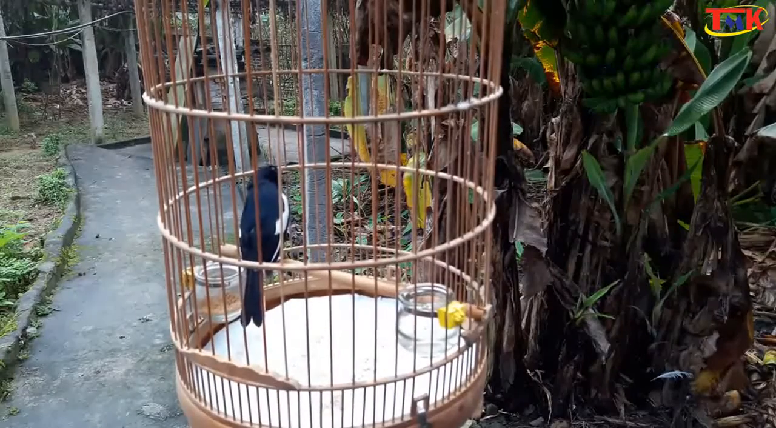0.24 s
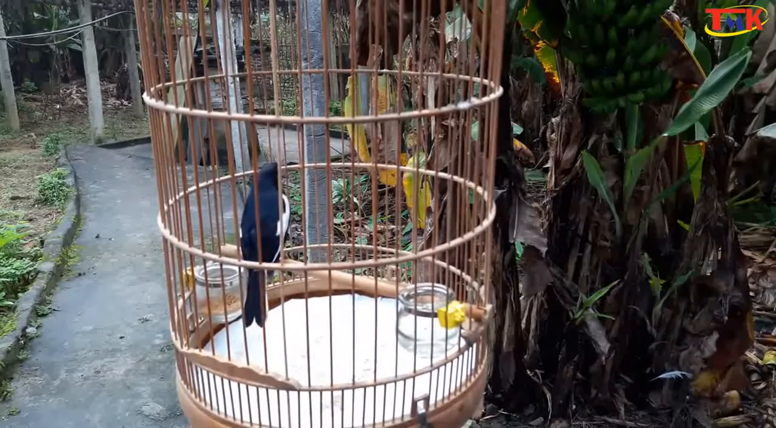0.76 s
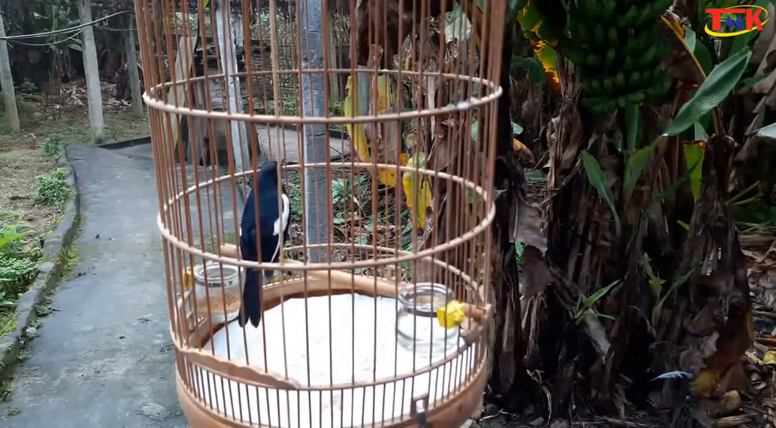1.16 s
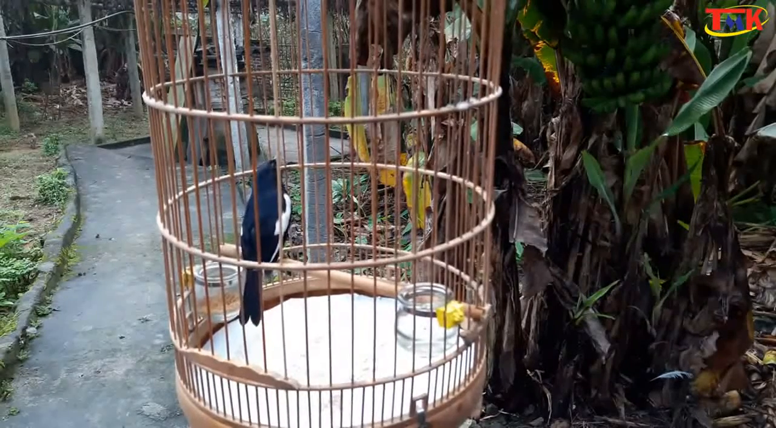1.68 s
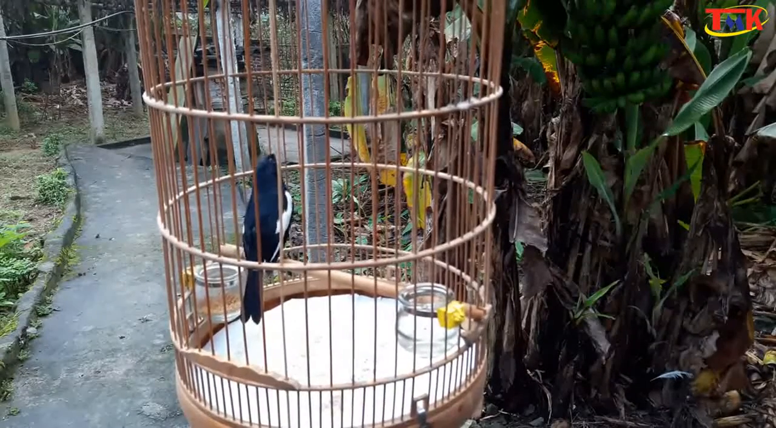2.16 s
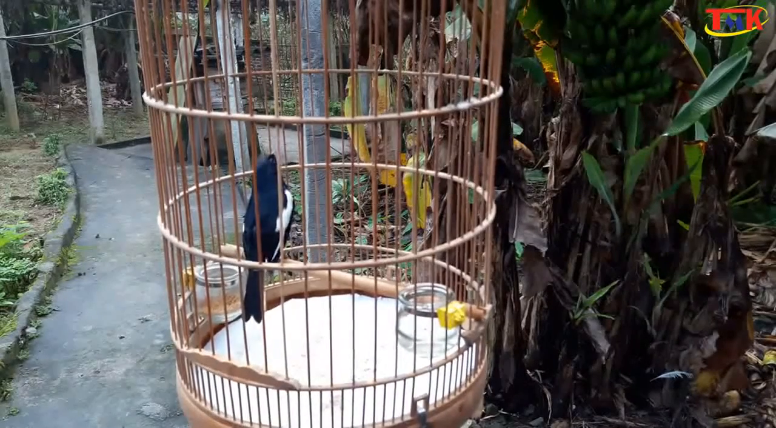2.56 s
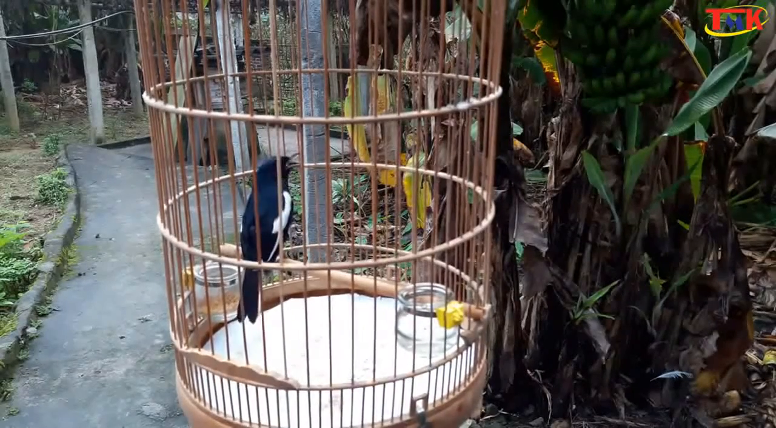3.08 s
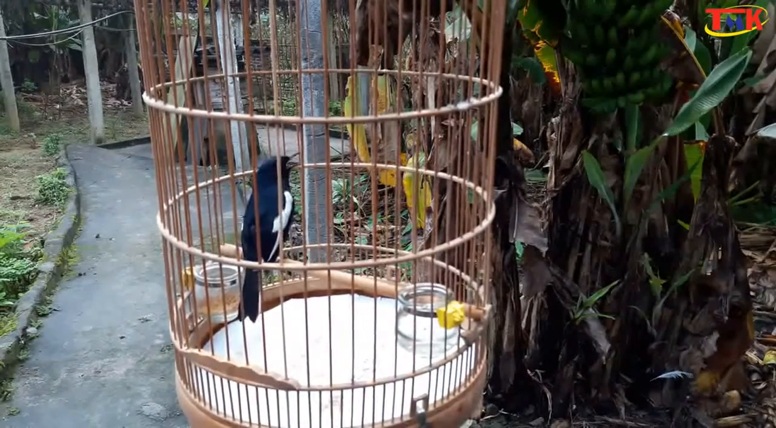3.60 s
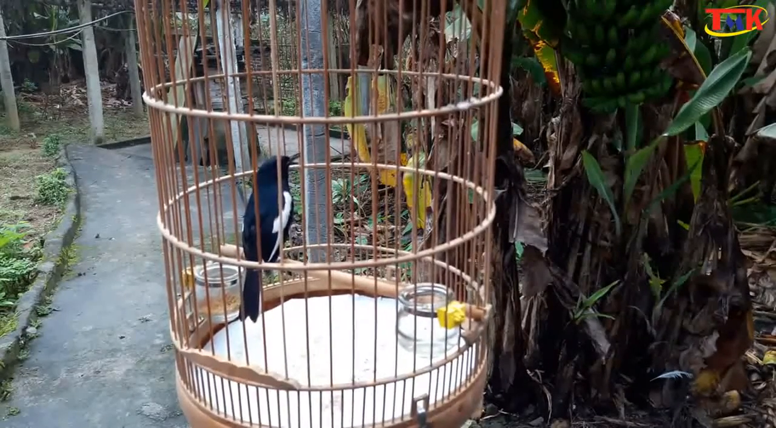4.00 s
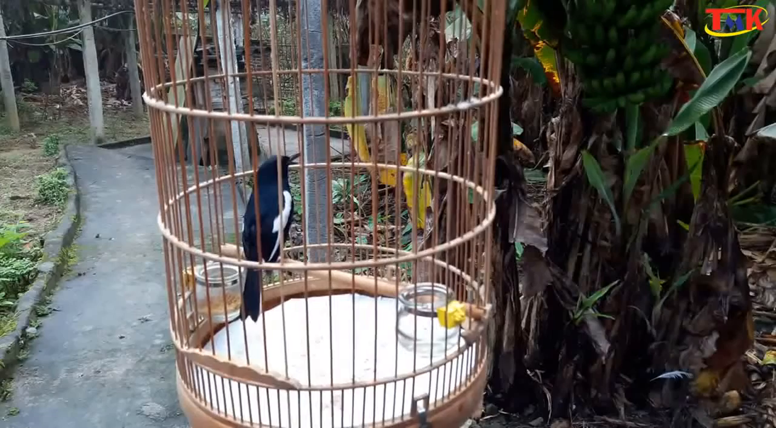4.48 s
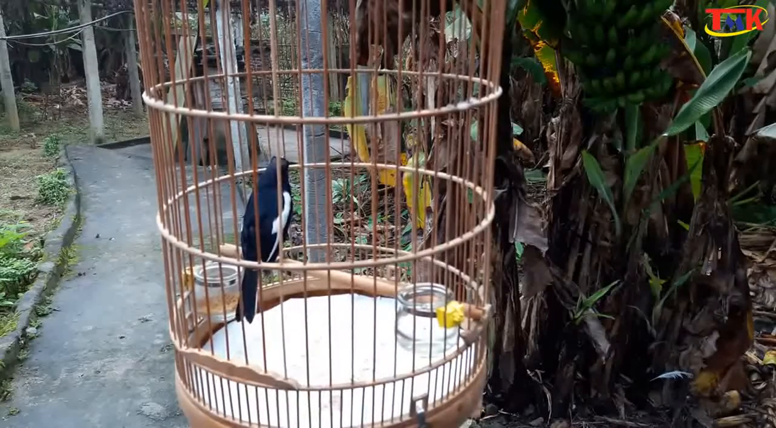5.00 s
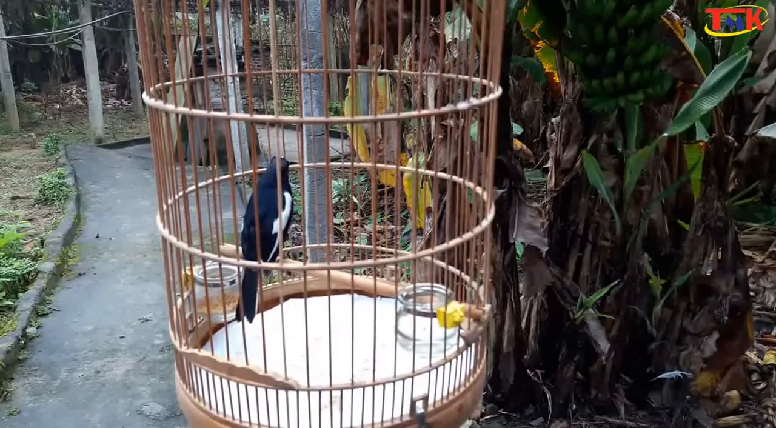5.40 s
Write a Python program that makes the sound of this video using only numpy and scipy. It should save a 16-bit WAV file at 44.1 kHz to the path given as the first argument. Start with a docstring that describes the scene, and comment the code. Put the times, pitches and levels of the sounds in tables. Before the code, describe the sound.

A caged songbird sings quick, loud phrases of sharp whistles and raspy swoops in a quiet garden, then stops.

```python
"""In a quiet garden, a caged magpie-robin sings nine quick phrases, then stops.
Its voice organ, the syrinx, has a low side and a high side that whistle separately and overlap;
where they clash in fast sweeps, the voice turns raspy. In a typical phrase a low whistle hands over
to a held high one, which flicks up and swoops while the low side arches. The path, a wall and the
plants echo the song into a camera's two microphones, over a faint distant rumble, hiss and hum."""
import sys
import numpy as np
from scipy import signal
from scipy.fft import rfft, irfft
from scipy.io import wavfile
from scipy.ndimage import uniform_filter1d, minimum_filter1d, map_coordinates

SR = 44100
rng = np.random.default_rng(int(sys.argv[2]) if len(sys.argv) > 2 else 0)


def materialize(psi):
    """Save the field psi as 16-bit PCM at rate SR to the path in sys.argv[1].

    A 1-D psi becomes a single channel; in a 2-D psi each row is a channel.
    """
    bounded = np.clip(np.atleast_2d(psi).T, -1, 1)
    quanta = np.round(bounded * 32767).astype(np.int16)
    wavfile.write(sys.argv[1], SR, quanta)


N = 249165
TIME = np.arange(N) / SR
ALONG = np.linspace(0, 1, 101)  # progress through one note
SILENT_DB = -100

# The throat passes the whistle and holds back what lies above and below it: pitch_hz, gain_db
THROAT_FILTER = [(700, -48), (1100, -35), (1600, -6.5), (2300, -11), (3000, 3), (4600, -4.5), (5600, -13.5),
                 (6500, -18), (7500, -20), (8700, -15.5), (10500, -19.5), (12000, -10.5), (13500, -30),
                 (15800, -9)]


def undb(db):
    """Turn decibels into a gain to multiply by."""
    return 10 ** (np.asarray(db) / 20)


def to_db(gain):
    """Turn a gain into decibels."""
    return 20 * np.log10(np.maximum(gain, undb(SILENT_DB)))


def at_pitch(hz, points):
    """Read between rows of (pitch_hz, value), giving every octave the same room."""
    pitches, values = np.transpose(points)
    return np.interp(np.log(np.maximum(hz, 1)), np.log(pitches), values)


def noise(colour):
    """Noise of average (rms) strength 1, shaped by rows of (pitch_hz, level_db)."""
    gain = undb(at_pitch(np.fft.rfftfreq(N, 1 / SR), colour))
    shaped = irfft(rfft(rng.standard_normal(N)) * gain, N)
    return shaped / shaped.std()


def wander(rate):
    """A smooth random wobble, roughly 1 in size, that changes about rate times a second."""
    place = np.arange(N) * rate / SR
    return map_coordinates(rng.standard_normal(N // 8 + 4), [place], order=2, mode="wrap")


def delay(sound, seconds):
    """The same sound a little later."""
    return map_coordinates(sound, [np.arange(N) - seconds * SR], order=1)


def note(times, hz, db, pan_db, rasp_db):
    """A note as five curves: time, pitch, level, pan (left minus right) and rasp."""
    return np.array(np.broadcast_arrays(times, hz, db, pan_db, rasp_db), float)


def bend(progress, first, middle, last):
    """A pitch that settles slowly on its middle value and leaves it late."""
    offset = 2 * progress - 1
    settling = (first - middle) * abs(offset) ** 2.05
    leaving = (last - middle) * abs(offset) ** 3.6
    return middle + np.where(offset < 0, settling, leaving)


def around_turn(start, turn, end):
    """Times through a note that turns once, and the offset from that turn (-1 to 1)."""
    offset = 2 * ALONG - 1
    return np.interp(offset, [-1, 0, 1], [start, turn, end]), offset


def opening_whistles(scoop_share=.16, scoop_s=.003, release_s=.012):
    """Pure low whistles that scoop up to their pitch, start softly, swell, hold and let go."""
    # start_s, end_s, attack_s, first_hz, middle_hz, last_hz, level_db, pan_db
    whistles = [ (-.04, .016, .02, 3000, 3120, 3230, -12, 6.5),
                (0.419, .508, 0.04, 2750, 3261, 3544, -8.5, 4),
                (0.886, .987, 0.039, 2950, 3171, 3105, -8.5, 8),
                (2.824, 2.915, 0.014, 2920, 3277, 3500, -7.5, 2.5),
                (3.319, 3.414, .01, 3030, 3170, 2988, -8.5, 1.5),
                (3.834, 3.919, 0.013, 2920, 3158, 3030, -8, 1.5), ]
    for start, end, attack, first, middle, last, db, pan_db in whistles:
        age = ALONG * (end - start)
        hz = bend(ALONG, first, middle, last) * (1 - scoop_share * np.exp(-age / scoop_s))
        swell = np.minimum(undb(-19.5) + (age / attack) ** 2.3, 1)
        release = np.minimum((age[-1] - age) / release_s, 1)
        yield note(start + age, hz, db + to_db(swell * release), pan_db, SILENT_DB)


def held_whistles(lead_db=-11, edge_s=.0052, flat_hz=109.7, rasp_db=-37.5):
    """High whistles that creep in a little flat, rasp as the two sides clash, then hold."""
    # start_s, end_s, lead_in_s, first_hz, middle_hz, last_hz, first_db, last_db, pan_db
    whistles = [ (0.014, 0.031, 0.0068, 3837, 3930, 3950, -10.5, -8.5, -1),
                (0.036, 0.121, 0.0062, 4200, 4266, 4230, -7.5, -9, 3.5),
                (.503, .565, .05, 4110, 4255, 4320, -9, -6.5, 8.5),
                (1.003, 1.085, .085, 3975, 3988, 4398, -5.5, -9, 6),
                (2.391, 2.425, 0.0067, 3863, 4082, 4342, -7, -7, -4),
                (2.427, 2.532, .005, 4250, 4328, 4370, -6.5, -16, 9),
                (2.927, 2.967, .07, 4280, 4333, 4562, -5.5, -8.5, 6.5),
                (3.417, 3.512, .06, 3965, 3984, 4280, -9.5, -13, -7.5),
                (3.923, 4.027, .07, 3895, 3904, 4165, -9.5, -13.5, -9.5), ]
    for start, end, lead, first, middle, last, first_db, last_db, pan_db in whistles:
        times = start - lead + ALONG * (end - start + lead)
        progress = np.clip((times - start) / (end - start), 0, 1)
        creep = np.clip(1 + (times - start) / lead, 0, 1)
        gate = np.interp(times, [start - edge_s, start, end - edge_s, end], [undb(lead_db), 1, 1, 0])
        db = first_db + (last_db - first_db) * progress + to_db(gate * creep ** 1.4)
        hz = bend(progress, first, middle, last) - flat_hz * (1 - creep)
        clash = np.exp(-((times - start + .016) / .021) ** 2)  # peaks just before the hold
        yield note(times, hz, db, pan_db, rasp_db + to_db(clash))


def chips(rasp_follows=.17):
    """Sharp high calls that climb, hold and plunge."""
    # start_s, length_s, level_db, rasp_db, pan_db
    calls = [(0.154, .082, -9.5, -27, -8.5), (2.549, .074, -7, -29.5, 8)]
    # The outline of every chip: share_of_length, pitch_hz, gain_db
    outline = [(0, 3500, -37), (0.119, 4290, -13), (0.321, 4576, -2.5), (.55, 4607, -2.5),
               (.63, 3500, -3.5), (.8, 2150, -19.5), (1, 1620, -25.5)]
    share, hz, gain_db = np.transpose(outline)
    for start, length, db, rasp_db, pan_db in calls:
        yield note(start + share * length, hz, db + gain_db, pan_db, rasp_db + rasp_follows * gain_db)


def arches(rise_db=20.5, fall_db=16):
    """Low notes that swell to a crest, then fade ever faster."""
    # start_s, crest_s, end_s, first_hz, crest_hz, last_hz, crest_db, rasp_db
    calls = [ (.161, .185, 0.21, 2400, 2780, 2767, -19, -38.5),
             (.585, .646, 0.68, 2270, 3330, 2690, -11, -37),
             (1.113, 1.13, 1.14, 2455, 2500, 2620, -20.5, -45.5),
             (1.14, 1.152, 1.172, 2820, 2880, 2893, -19.5, -44),
             (1.172, 1.179, 1.189, 2900, 2794, 2210, -16.5, -44.5),
             (1.752, 1.8, 1.81, 3200, 4243, 4300, -24.5, -55),
             (1.811, 1.815, 1.843, 4310, 3950, 2552, -8, -38.5),
             (1.858, 1.895, 1.92, 2720, 2874, 2948, -22, -49.5),
             (1.92, 1.98, 2.028, 2954, 3378, 3600, -11, -42),
             (2.326, 2.338, 2.351, 2750, 3113, 2694, -10, -62.5),
             (2.351, 2.365, 2.385, 2745, 3320, 2970, -3.5, -57),
             (2.558, 2.575, 2.558, 2750, 2820, 2777, -20.5, -44),
             (3.008, 3.051, 3.087, 2500, 3440, 2101, -9.5, -38.5),
             (3.545, 3.598, 3.61, 2680, 3050, 2605, -10, -51),
             (4.056, 4.089, 4.102, 2600, 3010, 3030, -13.5, -33),
             (4.104, 4.111, 4.127, 3050, 3060, 2646, -10, -37.5), ]
    for start, crest, end, first, crest_hz, last, crest_db, rasp_db in calls:
        times, offset = around_turn(start, crest, end)
        arriving = (first - crest_hz) * np.sin(np.pi / 2 * offset) ** 2
        leaving = (last - crest_hz) * offset ** 2
        hz = crest_hz + np.where(offset < 0, arriving, leaving)
        db = crest_db + np.where(offset < 0, rise_db * offset, -fall_db * offset ** 2)
        yield note(times, hz, db, pan_db=5, rasp_db=rasp_db)


def flicks(from_hz=4300, fade_db=12):
    """At the end of a held whistle, the pitch shoots up and levels off as it fades."""
    # start_s, end_s, top_hz, first_db
    calls = [(0.558, 0.582, 6300, -18.5), (1.087, 1.105, 5250, -17.5), (2.96, 2.985, 6300, -15),
             (3.506, 3.531, 5300, -13.5), (4.024, 4.042, 5000, -14)]
    for start, end, top_hz, db in calls:
        hz = from_hz + (top_hz - from_hz) * np.sin(np.pi / 2 * ALONG)
        yield note(start + ALONG * (end - start), hz, db - fade_db * ALONG, pan_db=0, rasp_db=-36.5)


def swoops(top_hz=5390, best_hz=3543, rasp_follows=.3):
    """Raspy V-shaped dives and climbs, loudest each time they pass the throat's best pitch."""
    # start_s, bottom_s, end_s, bottom_hz, level_db, rasp_db
    calls = [ (0.586, 0.6, .638, 2750, -20.5, -31), (1.102, 1.125, 1.158, 2600, -14, -32.5),
             (1.166, 1.185, 1.202, 3100, -12.5, -35), (2.986, 3.005, 3.043, 2850, -15.5, -31.5),
             (3.529, 3.55, 3.59, 2750, -13, -31), (3.591, 3.613, 3.636, 2800, -12.5, -34),
             (4.042, 4.063, 4.102, 2600, -18.5, -31.5), (4.111, 4.125, 4.148, 3233, -16.5, -36.5), ]
    for start, bottom, end, bottom_hz, db, rasp_db in calls:
        times, offset = around_turn(start, bottom, end)
        hz = bottom_hz + (top_hz - bottom_hz) * abs(offset) ** 1.4
        fade_db = -58.5 * np.log2(hz / best_hz) ** 2 + .5 * offset
        yield note(times, hz, db + fade_db, pan_db=2, rasp_db=rasp_db + rasp_follows * fade_db)


def slurs():
    """Two long notes of the high side that slide from pitch to pitch."""
    # One list of points for each note: time_s, pitch_hz, level_db, pan_db, rasp_db
    slides = [
        [(1.52, 3600, -45, -2, -68), (1.526, 3940, -17.5, 4, -73.5), (1.543, 4140, -7.5, 5, -70.5),
         (1.56, 4180, -10.5, 2, -70), (1.6, 3670, -12.5, 4, -49.5), (1.62, 3235, -8, 0, -48.5),
         (1.635, 3006, -17.5, 10, -49), (1.642, 2326, -52, 0, -59.5)],
        [(1.736, 5920, -36, -4.5, -67), (1.748, 5740, -12, -2, -58), (1.765, 5460, -16, -2, -40),
         (1.78, 4845, -7.5, 8, -41.5), (1.795, 4547, -2.5, -1, -42), (1.822, 4334, -14, 13, -32.5),
         (1.86, 4140, -30, -1, -30.5), (1.888, 4650, -14.5, 7.5, -29.5), (1.948, 5438, -24, -3.5, -31),
         (1.998, 4555, -6, 11.5, -37), (2.048, 3934, -18, -3, -40), (2.059, 3168, -9.5, 6, -41.5),
         (2.074, 2574, -24, -3, -41.5), (2.099, 2257, -19, 2, -46.5), (2.107, 2937, -16.5, 2, -60.5),
         (2.116, 3003, -26, 10, -70)],
    ]
    return [np.transpose(points) for points in slides]


def rasp_strength(notes, smooth_s=.0056):
    """How strongly the airflow breaks up at each moment: the rasp of all sounding notes together."""
    power = sum(np.interp(TIME, np.sort(times), undb(rasp_db) ** 2, left=0, right=0)
                for times, *_, rasp_db in notes)
    return uniform_filter1d(np.sqrt(power), int(smooth_s * SR))


def syrinx_side(notes, unrest, jitter, rasp_jitter, flutter_db, glide_s=.0025):
    """One side of the voice organ glides through its notes, giving pitch, strength and pan."""
    hz = np.full(N, notes[0][1][0])  # wait on the first note's pitch
    strength, pan_db = np.zeros(N), np.zeros(N)
    glide = int(glide_s * SR)
    for times, pitch, db, note_pan_db, _ in notes:
        times = np.sort(times)
        span = slice(max(int(times[0] * SR) - glide, 0), int(times[-1] * SR) + glide)
        t = TIME[span]
        hz[span] = uniform_filter1d(np.interp(t, times, pitch), glide)
        strength[span] += uniform_filter1d(np.interp(t, times, undb(db), left=0, right=0), glide)
        pan_db[span] = np.interp(t, times, note_pan_db)
    # broken airflow shakes both pitch and strength
    hz *= 1 + jitter * wander(150) + rasp_jitter * unrest * wander(1100)
    strength *= undb(flutter_db * unrest * wander(500))
    return hz, strength, uniform_filter1d(pan_db, glide)


def throat_tone(hz):
    """A pure tone on a moving pitch, as the throat lets it out."""
    gain = undb(at_pitch(abs(hz), THROAT_FILTER)) * (abs(hz) < SR / 2)
    return gain * np.sin(2 * np.pi * np.cumsum(hz) / SR)


def overtones(hz, strength, flicker_db=3):
    """The syrinx also makes flickering tones at whole multiples of the whistle's pitch."""
    # Overtones before the throat shapes them: multiple, level_db
    series = [(2, -14), (3, -18), (4, -26.5), (5, -22)]
    # notes below the throat's best pitch need a wider swing, so their overtones stand out
    swing = strength / undb(at_pitch(np.minimum(hz, 4000), THROAT_FILTER))
    return sum(swing * undb(db + flicker_db * wander(330)) * throat_tone(multiple * hz)
               for multiple, db in series)


def clash_tones(low, high, unrest):
    """The sides share one airflow and shake each other, adding sums and differences of their pitches."""
    (low_hz, low_strength, _), (high_hz, high_strength, _) = low, high
    sum_tone = undb(-7 + 15 * np.minimum(unrest, 1)) * throat_tone(low_hz + high_hz)
    difference_tone = undb(-13) * throat_tone(high_hz - low_hz)
    side_tones = sum(throat_tone(2 * low_hz + sign * high_hz) + throat_tone(2 * high_hz + sign * low_hz)
                     for sign in (-1, 1))
    return np.sqrt(abs(low_strength * high_strength)) * (sum_tone + difference_tone + undb(-18) * side_tones)


def rasping_air(rasp, whistle_strength, breath_db=-35):
    """Broken airflow hisses in the raspy stretches, and a little breath goes with every whistle."""
    # The tone colour of the hiss: pitch_hz, level_db
    colour = [(150, -35.5), (700, -47.5), (1200, -20.5), (1800, -11.5), (2800, -0.5), (4500, -3),
              (5600, -8.5), (7000, -4), (8800, -5), (10500, -11.5), (12500, -2), (15800, -18)]
    return (rasp * undb(2.7 * wander(250)) + undb(breath_db) * whistle_strength) * noise(colour)


def bird(overtone_boost_db=8, fray_db=-12):
    """Both sides sing, giving the whistles panned and plain, and the harsh part of the voice."""
    low_notes = [*opening_whistles(), *arches()]
    high_notes = [*held_whistles(), *flicks(), *swoops(), *chips(), *slurs()]
    rasp = rasp_strength(low_notes + high_notes)
    unrest = np.clip(rasp / undb(-30), 0, 1.5)  # 0 is smooth airflow, 1 is very raspy
    low = syrinx_side(low_notes, unrest, jitter=.0024, rasp_jitter=.0091, flutter_db=2)
    high = syrinx_side(high_notes, unrest, jitter=.002, rasp_jitter=.009, flutter_db=4.5)
    panned, plain, harsh, whistle_strength = 0, 0, 0, 0
    for hz, strength, pan_db in (low, high):
        tone = strength * np.sin(2 * np.pi * np.cumsum(hz) / SR)
        mic_gains = undb(np.array([pan_db, -pan_db]) / 2)
        panned += tone * mic_gains / np.sqrt(np.mean(mic_gains ** 2, axis=0))
        plain += tone
        whistle_strength += strength
        harsh += overtones(hz, strength) * undb(overtone_boost_db * unrest)
        # chaotic swings fray the whistle into a band of noise that follows its pitch
        harsh += tone * unrest * undb(fray_db) * wander(2400)
    harsh += clash_tones(low, high, unrest) + rasping_air(rasp, whistle_strength)
    return panned, plain, harsh


def scatter(sound, db, fade_s, build_s, dull_hz):
    """Many small echoes, different at each microphone, that build up and fall 60 dB in fade_s."""
    t = TIME[:SR]
    tail = rng.standard_normal((2, SR)) * undb(-60 * t / fade_s) * (1 - np.exp(-t / build_s))
    tail /= np.sqrt(np.sum(tail ** 2, axis=1, keepdims=True))
    tail = signal.lfilter(*signal.butter(1, dull_hz, fs=SR), tail)
    return undb(db) * signal.fftconvolve(sound[None], tail, axes=1)[:, :N]


def garden_echoes(song):
    """The hard path and wall nearby, the plants and the far garden all throw the song back."""
    # Echoes from hard surfaces: left_delay_s, right_delay_s, level_db
    surfaces = [(.00744, .00741, -17.5), (0.0103, 0.013, -11)]
    near = sum(undb(db) * np.array([delay(song, left), delay(song, right)])
               for left, right, db in surfaces)
    plants = scatter(song, db=-14, fade_s=.17, build_s=.004, dull_hz=18000)
    far = scatter(song, db=-22.5, fade_s=.44, build_s=.028, dull_hz=13020)
    return near + plants + far


def distant_background(level_db=-56.5):
    """Distant rumble and hiss, alike in the bass at both microphones."""
    # The tone colour of the background: pitch_hz, level_db
    colour = [(15, -43.5), (32, -17.5), (58, -9.5), (110, -5.5), (250, -6), (450, -9.5), (850, -8.5),
              (1300, -14), (2100, -13.5), (3300, -19.5), (4500, -19.5), (6300, -24), (9500, -18),
              (11500, -21.5), (15800, -23.5)]
    # How alike the two microphones hear it: pitch_hz, likeness (0 unrelated, 1 the same)
    likeness = [(60, 1), (300, .8), (700, 0), (1500, 0), (8000, 0)]
    alike = at_pitch(np.fft.rfftfreq(N, 1 / SR), likeness)
    shared = irfft(rfft(noise(colour)) * np.sqrt((1 + alike) / 2), N)
    opposite = irfft(rfft(noise(colour)) * np.sqrt((1 - alike) / 2), N)
    air = np.array([shared + opposite, shared - opposite]) / shared.std()
    return air * undb(level_db + .5 * wander(2.8))


def distant_hum(waver_hz=4):
    """A faint far-off hum of wavering tones."""
    # pitch_hz, level_db
    tones = [(102.3, -72.5), (249, -67.5), (710.6, -72.5), (855.9, -70.5), (904.4, -73), (1949, -74),
             (2159, -76)]
    hum = 0
    for hz, db in tones:
        phase = 2 * np.pi * np.cumsum(hz + waver_hz * wander(25)) / SR
        hum += undb(db) * np.sqrt(2) * np.sin(phase)
    return hum


def rumble_swells(width_s=.14):
    """Dull low noise swells faintly under the closing flourishes of four phrases."""
    # peak_s, level_db
    swells = [(.59, -56), (1.15, -53.5), (3.57, -63), (4.09, -53)]
    strength = sum(undb(db) * np.exp(-((TIME - peak) / width_s) ** 2) for peak, db in swells)
    colour = [(25, -10), (60, 0), (120, 3), (260, -4.5), (450, -24.5), (700, 5), (1100, -26),
              (3000, -60.5)]
    return strength * noise(colour)


def scene(harsh_direct_db=-6, harsh_spread_db=4, right_lag_s=4 / SR):
    """The bird sits a little to the left and faces away, so its harsh part arrives mostly as echoes."""
    panned, plain, harsh = bird()
    left, right = panned + undb(harsh_direct_db) * harsh
    direct = np.array([left, delay(right, right_lag_s)])
    cage = scatter(harsh, db=-6.5, fade_s=.06, build_s=.00025, dull_hz=20000)
    garden = garden_echoes(plain + undb(harsh_spread_db) * harsh)
    return direct + cage + garden + rumble_swells() + distant_background() + distant_hum()


def record(dry, ceiling_db=-4, top_hz=16150):
    """The camera's limiter eases down the loudest peaks; then the highest treble is cut."""
    wanted_gain = np.minimum(1, undb(ceiling_db) / (abs(dry).max(axis=0) + 1e-9))
    gain = uniform_filter1d(minimum_filter1d(wanted_gain, size=400), size=400)
    treble_cut = np.clip((top_hz - np.fft.rfftfreq(N, 1 / SR)) / 250, 0, 1)
    return irfft(rfft(dry * gain) * treble_cut, N)


dry = scene()
out = record(dry)
materialize(out)
```